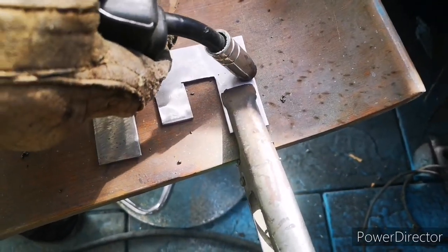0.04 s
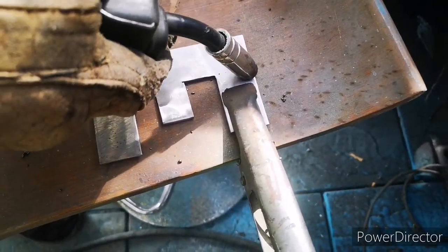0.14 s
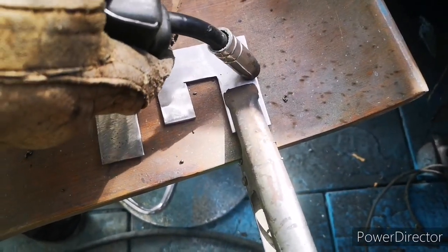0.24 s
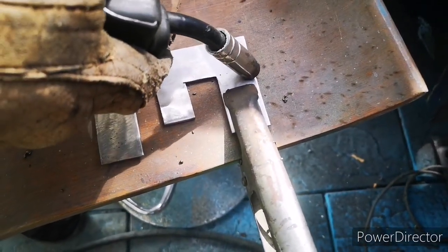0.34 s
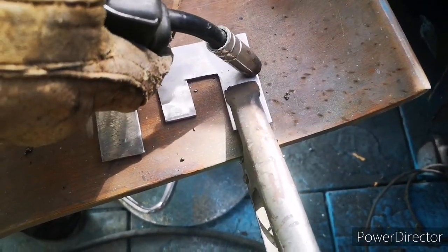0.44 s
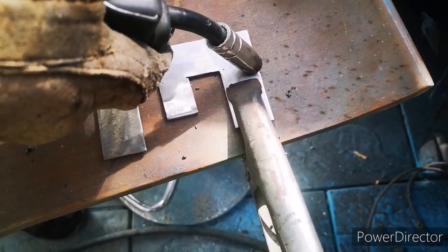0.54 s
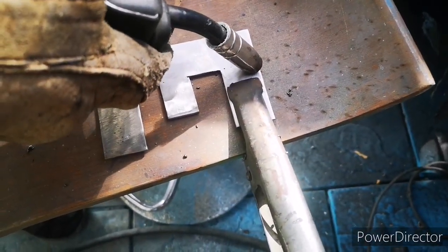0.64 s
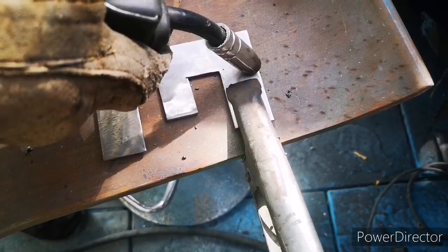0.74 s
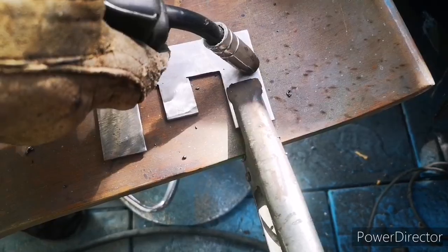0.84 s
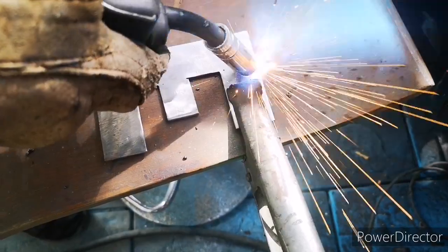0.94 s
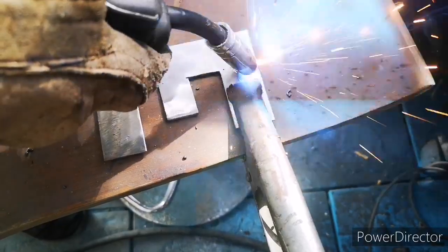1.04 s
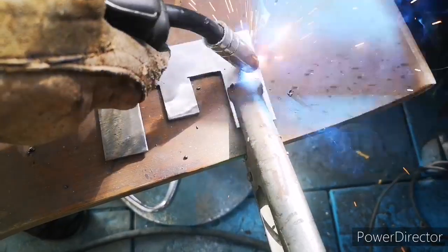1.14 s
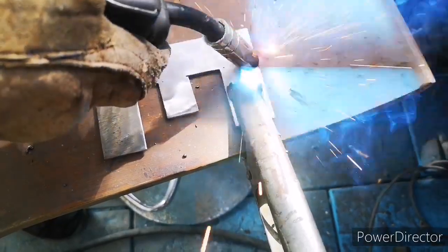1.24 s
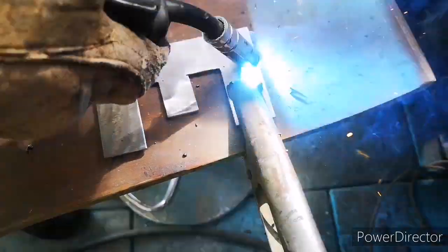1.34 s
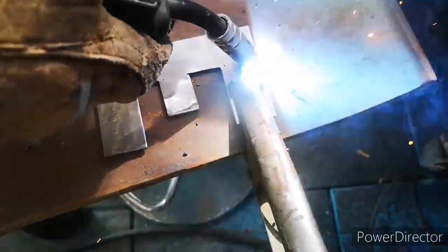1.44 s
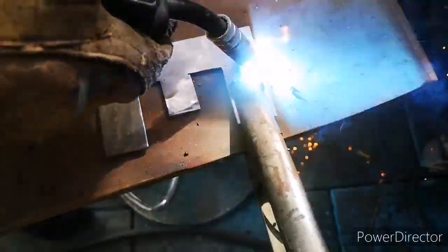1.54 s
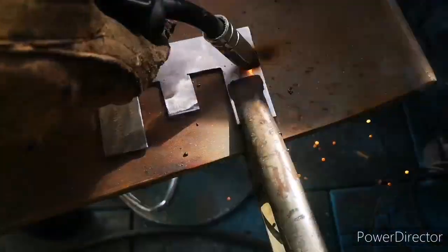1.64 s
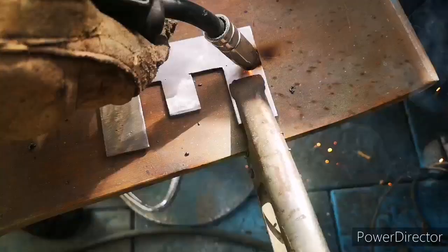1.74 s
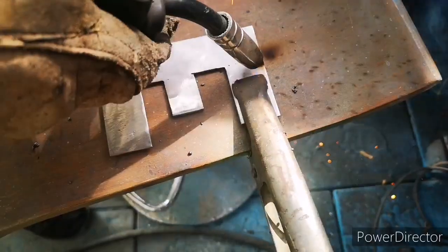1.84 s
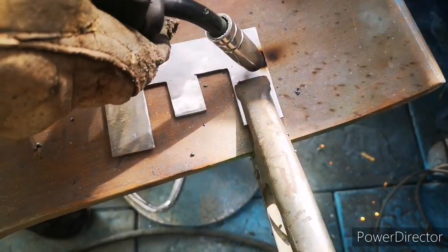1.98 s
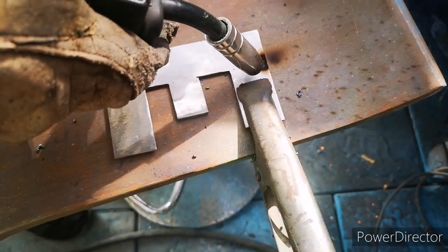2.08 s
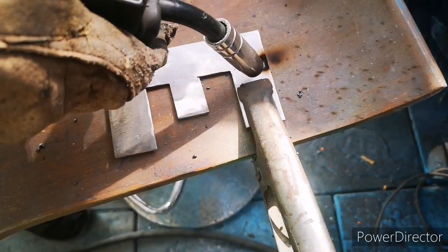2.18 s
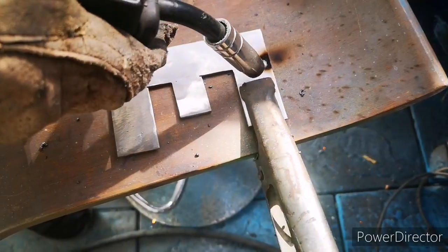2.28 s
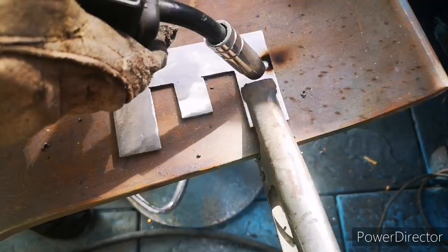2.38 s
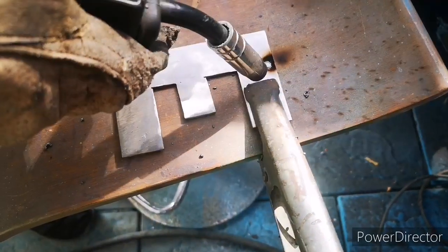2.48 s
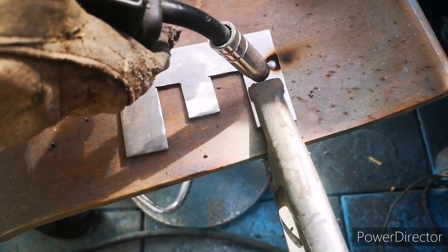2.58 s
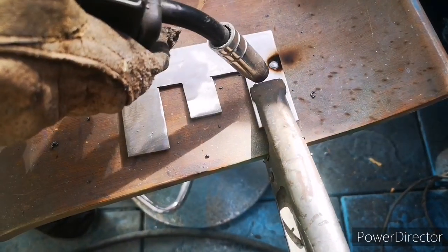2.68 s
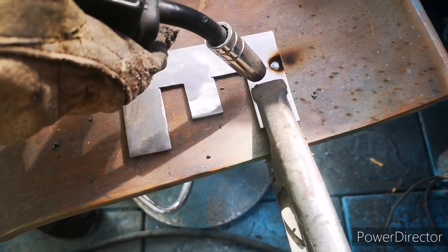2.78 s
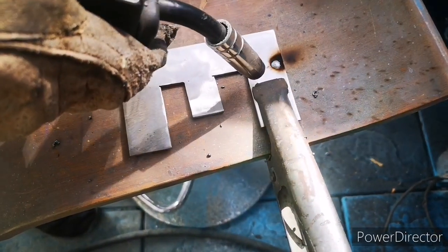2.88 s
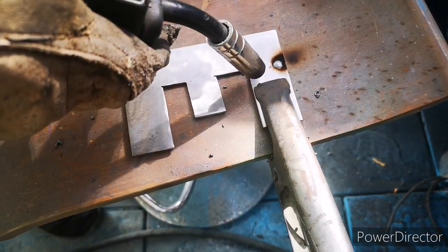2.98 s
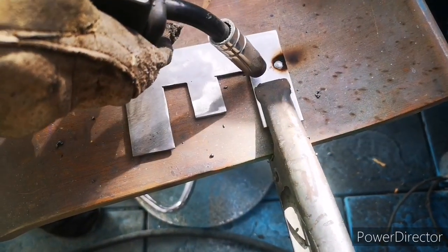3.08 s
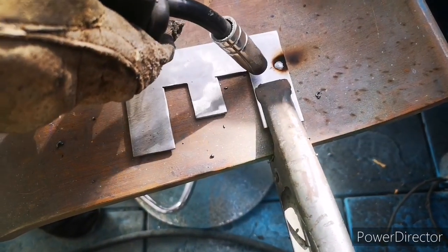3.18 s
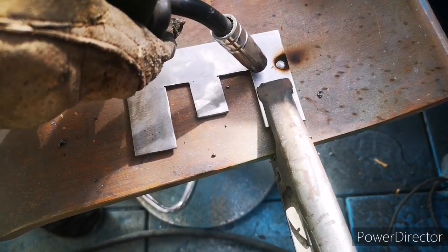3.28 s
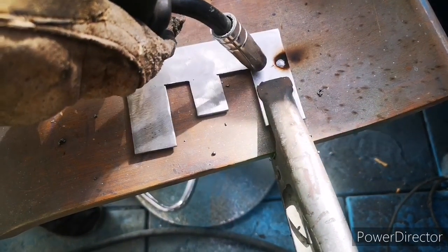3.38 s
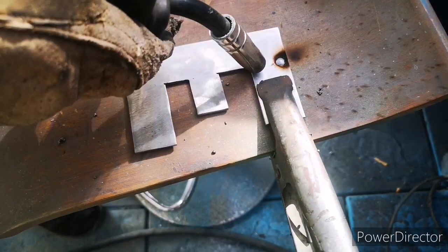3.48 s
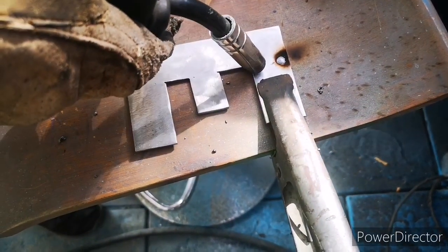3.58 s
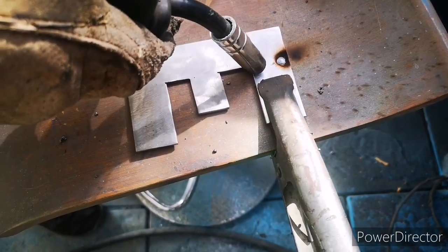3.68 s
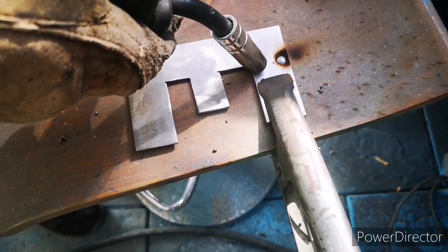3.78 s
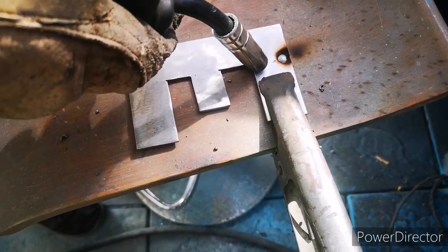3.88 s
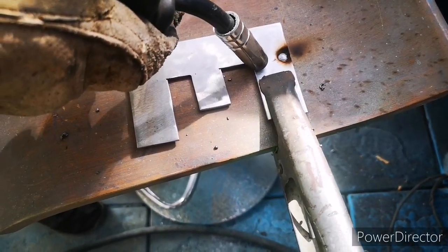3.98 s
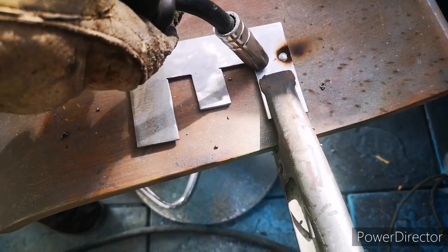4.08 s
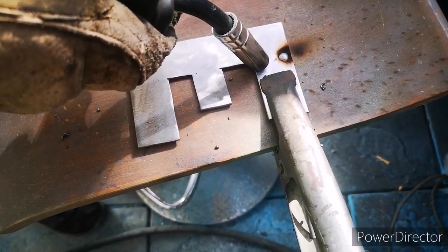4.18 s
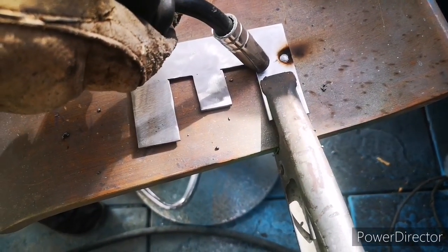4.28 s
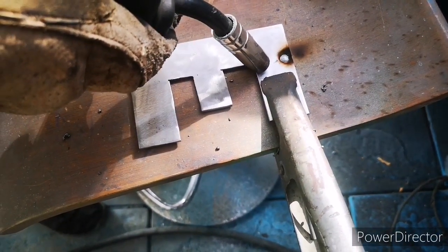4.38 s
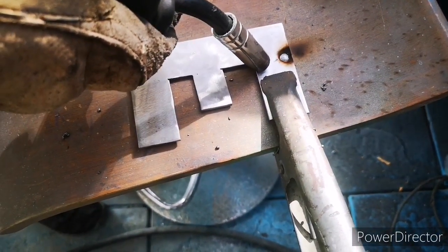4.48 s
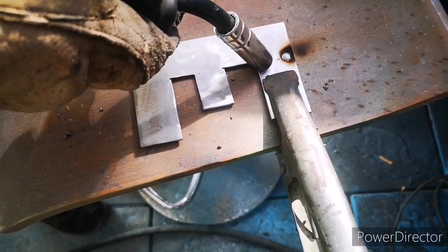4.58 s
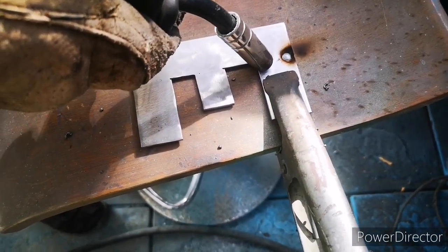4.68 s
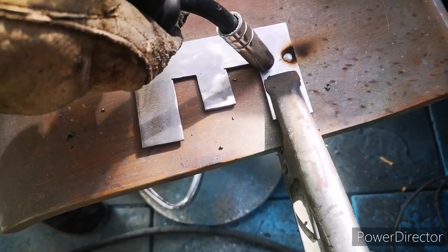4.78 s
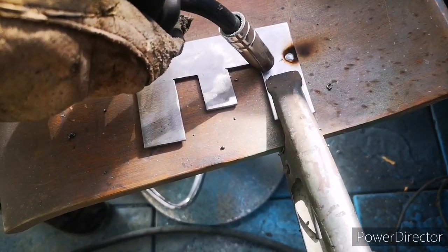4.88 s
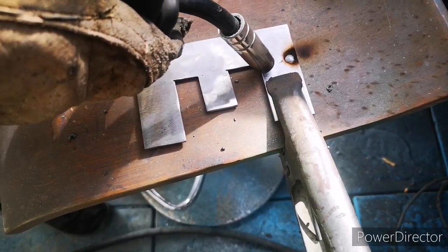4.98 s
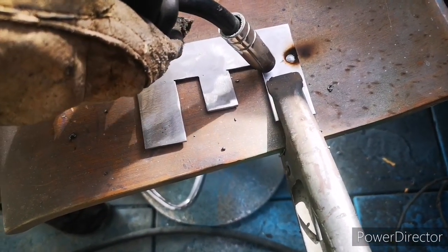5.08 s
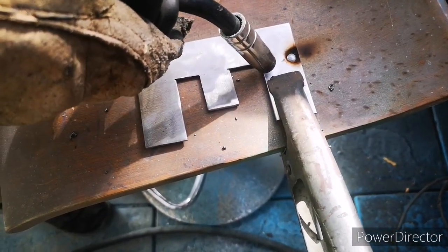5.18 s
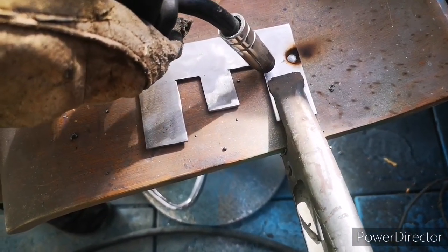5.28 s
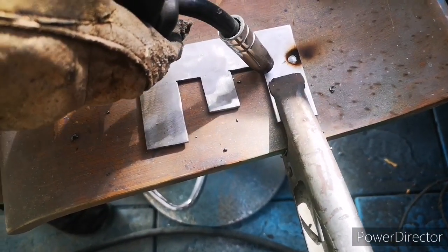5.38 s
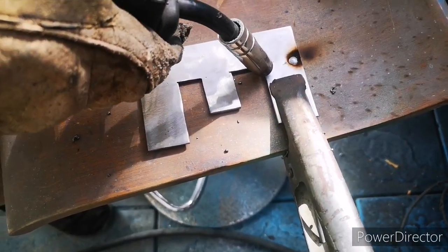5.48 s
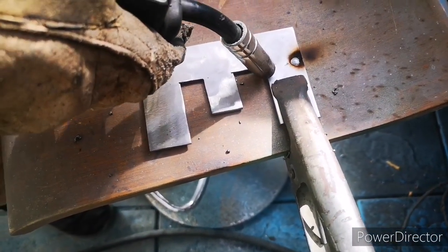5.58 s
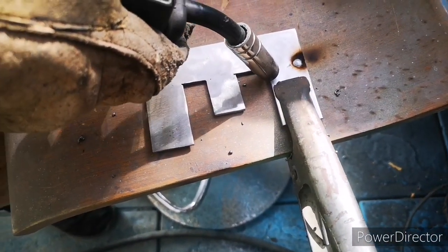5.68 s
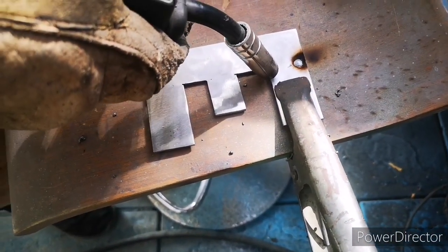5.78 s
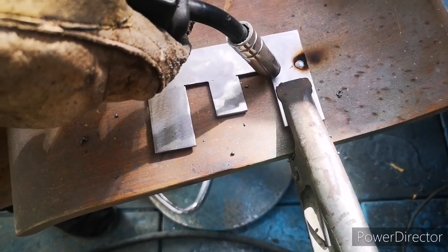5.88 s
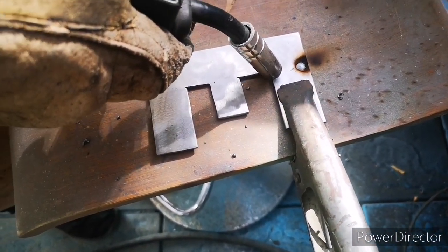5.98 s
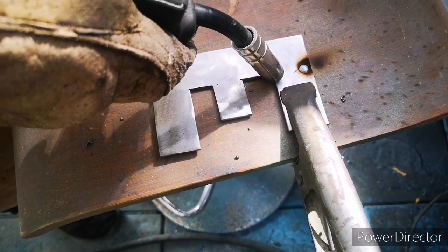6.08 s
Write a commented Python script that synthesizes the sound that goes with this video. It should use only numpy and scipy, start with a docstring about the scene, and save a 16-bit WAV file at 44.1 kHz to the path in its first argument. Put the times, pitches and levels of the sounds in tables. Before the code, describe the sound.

Short spot weld in a garage: harsh electric popping, a clunk, tiny metallic pings, later hissing gas and whirring wire feed without an arc.

```python
"""Spot weld in a garage

A wire welder lays one spot weld on thin steel, heard by a phone with a left port brighter than its right. The
trigger knocks, the contactor clunks, filtered noise makes the wire feed, and arc pops crack, mostly on the
crests of the mains ripple; spatter beads then ping the plate as decaying modes. Later the trigger is pulled
without an arc. Gas hisses in spells through resonant peaks, a glove rubs the bench, over transformer hum and
fan rumble, whose recorded level the phone's automatic gain raises and lowers together, as a table of levels."""
import sys
import numpy as np
from scipy import signal
from scipy.fft import rfft, irfft
from scipy.io import wavfile
from scipy.ndimage import uniform_filter1d

SR = 44100
rng = np.random.default_rng(int(sys.argv[2]) if len(sys.argv) > 2 else 0)


def ratio_of_db(decibels):
    """Turn decibels (scalar or array-like) into linear amplitude factors; 0 dB maps to 1."""
    return 10 ** (np.asarray(decibels, float) / 20)


def dump(signal):
    """Clip the signal to [-1, 1] and save it as 16-bit WAV at the path in sys.argv[1]."""
    limited = np.clip(np.atleast_2d(signal).T, -1, 1)
    pcm = np.round(limited * 32767).astype(np.int16)
    wavfile.write(sys.argv[1], SR, pcm)


N = 270333
T = np.arange(N) / SR
RIPPLE_HZ = 100
# Levels in dB are settings at the source, ahead of further gains, room and microphone ports.


def unit(x):
    """Scale to rms 1."""
    return x / np.sqrt(np.mean(x ** 2))


def curve(rows):
    """Gain over time through (s, dB) rows, silent outside them."""
    s, db = np.transpose(np.array(rows, float))
    return ratio_of_db(np.interp(T, s, db, -200, -200))


def colour(x, points, size=2048):
    """Minimum-phase filter through (Hz, dB) points, built by folding the cepstrum."""
    hz, db = np.transpose(points)
    bins_hz = np.arange(size // 2 + 1) * SR / size
    gain = ratio_of_db(np.interp(np.log(bins_hz + 1), np.log(hz), db))
    cepstrum = irfft(np.log(gain))
    cepstrum[1:size // 2] *= 2
    cepstrum[size // 2 + 1:] = 0
    response = irfft(np.exp(rfft(cepstrum)))[:size // 2]
    return signal.oaconvolve(x, response)[:len(x)]


def band(x, hz, width):
    """One resonance, gain 1 at the centre."""
    return signal.lfilter(*signal.iirpeak(hz, hz / width, SR), x)


def noise():
    """White noise."""
    return rng.standard_normal(N)


def walk(rate):
    """Slow random wander of rms 1, smoothed twice over 1/rate seconds."""
    k = int(SR / rate)
    return unit(uniform_filter1d(uniform_filter1d(noise(), k), k))


def strikes(times, gains):
    """Single-sample impulses."""
    out = np.zeros(N)
    np.add.at(out, (np.asarray(times) * SR).astype(int), gains)
    return out


def ring(x, modes, rise_s=1e-5):
    """Impulses ring a set of decaying modes (Hz, dB, t60 s)."""
    t = T[:SR // 2]
    shape = sum(ratio_of_db(db - 60 * t / t60) * np.sin(2 * np.pi * hz * t) for hz, db, t60 in modes)
    shape *= 1 - np.exp(-t / rise_s)
    return signal.oaconvolve(x, shape / abs(shape).max())[:N]


def spell(start, rise_s, stop, db, fall_db_per_s, sag_db_per_s=0, burst_db=0, burst_s=1):
    """Gain that rises from silence to a burst, holds with a slow sag until stop, then falls."""
    since = np.clip(T - start - rise_s, 0, None)
    rise_db = -40 * np.clip(1 - (T - start) / rise_s, 0, 5)
    burst = burst_db * np.exp(-since / burst_s)
    return ratio_of_db(db + rise_db + burst - sag_db_per_s * since - fall_db_per_s * np.clip(T - stop, 0, 1))


# Balance of the microphone ports for close sounds and for the room.
# Each row: frequency in Hz, left minus right in dB.
CLOSE_BALANCE = [(60, 28.5), (110, -13), (200, -3.5), (380, 4.5), (700, 5), (1290, 4.5), (2380, 8),
                 (4400, 12.5), (8120, 38), (15000, 14.5)]
ROOM_BALANCE = [(60, 8), (110, 5), (200, 0), (380, -1), (700, 4.5), (1290, 3), (2380, 12.5), (4400, 5),
                (8120, 4), (15000, 1)]


def ports(left, right, balance, lag_ms):
    """Each port colours its sound; the right one hears it later."""
    hz, db = np.transpose(balance)
    total = 10 * np.log10((1 + ratio_of_db(2 * db)) / 4)
    late = np.interp(T - lag_ms / 1000, T, right)
    return np.array([colour(left, np.transpose([hz, db - total])),
                     colour(late, np.transpose([hz, -total]))])


def spread(make, share, balance, lag_ms):
    """Steady noise: the right port gets partly the same, partly unrelated sound."""
    same, other = make(), make()
    return ports(same, share * same + np.sqrt(1 - share ** 2) * other, balance, lag_ms)


# Garage reverberation. Each row: band centre in Hz, t60 in seconds.
GARAGE_T60 = [(300, 0.25), (1000, 0.29), (3000, 0.33), (7000, 0.16), (13000, 0.061)]


def echoes(x, wet_db):
    """Direct sound plus a diffuse tail, shortest in the high treble; its lowest band is alike at both ports."""
    t = T[:SR // 2]

    def fade(hz, t60):
        return band(rng.standard_normal(len(t)), hz, 1.1 * hz) * ratio_of_db(-60 * t / t60)

    bass = fade(*GARAGE_T60[0])
    out = []
    for _ in range(2):
        tail = bass + sum(fade(hz, t60) for hz, t60 in GARAGE_T60[1:])
        tail = tail * np.clip(t / 0.003, 0, 1)
        tail /= np.sqrt(np.sum(tail ** 2))
        out.append(x + ratio_of_db(wet_db) * signal.oaconvolve(x, tail)[:N])
    return out


# Level of hum and fan as the phone's automatic gain raises and lowers them together.
# Each row: time in seconds, level in dB.
SHOP_LEVEL = [(0.0, -48), (0.14, -42.5), (0.36, -48), (0.94, -48), (1.06, -36), (1.16, -55), (1.47, -48.5),
              (1.79, -43.5), (2.46, -50.5), (2.99, -51.5), (3.28, -44.5), (3.45, -49), (3.77, -46.5),
              (4.17, -47), (5.02, -45.5), (5.16, -52.5), (5.34, -45.5), (5.7, -52), (5.87, -45),
              (6.13, -47)]
# Colours of the fan rumble and of the room noise. Each row: frequency in Hz, gain in dB.
FAN_COLOUR = [(18, -33.5), (32, 1), (60, -8.5), (88, -19), (115, -10), (150, -3.5), (190, -0.5), (212, 0.5),
              (225, 5.5), (245, -7.5), (340, -18), (450, -53.5)]
AIR_COLOUR = [(180, -26.5), (300, -11), (366, -9), (447, -3.5), (574, -6.5), (749, -5), (1100, -11.5),
              (1500, -14), (2360, -10), (4160, -28.5), (5800, -32.5), (7800, -34), (9500, -46),
              (15000, -57.5)]
# Faint tones. Each row: frequency in Hz, level in dB.
WHINE_TONES = [(1250, -71.5), (1300, -79.5), (1524, -76.5), (7790, -85.5)]


def shop():
    """Transformer hum at the ripple rate, fan rumble, faint whines and diffuse room noise."""
    level = curve(SHOP_LEVEL)
    hum = np.sin(2 * np.pi * RIPPLE_HZ * T + 0.33 * walk(1.7))
    hum *= np.sqrt(2) * level * ratio_of_db(1.1 * walk(6))
    fan = spread(lambda: unit(colour(noise(), FAN_COLOUR, size=8192)), 1.0, ROOM_BALANCE, 0.76)
    fan *= level * ratio_of_db(2.6 * walk(4.4))
    air = spread(lambda: unit(colour(noise(), AIR_COLOUR)), 0.5, ROOM_BALANCE, 0.6)
    air *= ratio_of_db(-58 + 0.095 * walk(3.3))
    tones = sum(ratio_of_db(db + 1.2 * walk(5.9)) * np.sin(2 * np.pi * hz * T) for hz, db in WHINE_TONES)
    return hum + fan + air + ports(tones, tones, CLOSE_BALANCE, 0.47)


# Gas spells. Each row: opening in seconds, level in dB, start of easing in seconds, easing in dB,
# shutting in seconds.
GAS_SPELLS = [(-.1, -54, .2, 8, .95), (3.535, -52, 3.93, 6.5, 4.33), (5.738, -51.5, 6.2, 5, 6.3)]
# Colour of the broad hiss. Each row: frequency in Hz, gain in dB.
HISS_COLOUR = [(1530, -43), (2600, -54), (3660, 7.5), (4390, -5.5), (5040, 3.5), (6230, 0), (7890, 5),
               (9330, -6), (14500, -10.5), (15500, -21), (16000, -53)]
# Resonant peaks of the hiss. Each row: frequency in Hz, base width in Hz (doubled or tripled below), level in
# dB.
HISS_PEAKS = [(1956, 76, 7.5), (2167, 64, 14), (3652, 95, 7), (5010, 70, 3.5), (5670, 75, -2.5),
              (7740, 130, -6), (9270, 73, -19), (10800, 120, -20), (12300, 130, -22), (13600, 130, -15)]


def gas():
    """Broad hiss through resonant peaks; the two lowest make the whistle band."""
    def hiss():
        air = noise()
        peaks = sum(ratio_of_db(db) * band(air, hz, 3 * w) for hz, w, db in HISS_PEAKS[2:])
        return unit(unit(colour(air, HISS_COLOUR)) + .6 * unit(peaks))

    def whistle():
        air = noise()
        return unit(sum(ratio_of_db(db) * band(band(air, hz, 2 * w), 1920, 980) for hz, w, db in HISS_PEAKS[:2]))

    flow = 0
    for opens, db, eases, ease_db, shuts in GAS_SPELLS:
        puff = spell(opens, 0.014, shuts, db, fall_db_per_s=1999, sag_db_per_s=0.5, burst_db=1, burst_s=0.034)
        flow = flow + puff * ratio_of_db(-ease_db * np.clip((T - eases) / 0.081, 0, 1))
    broad = spread(hiss, 0.76, CLOSE_BALANCE, 0.65)
    whistling = ratio_of_db(2.5 + 0.67 * walk(8.6)) * spread(whistle, 0.66, CLOSE_BALANCE, 0.57)
    return flow * (broad + whistling)


# Glove rubbing on the bench. Each row: start in seconds, stop in seconds, level in dB, fall in dB per second.
RUBS = [(0.012, 0.027, -46.5, 500), (0.037, 0.096, -56.5, 200), (.1, 0.155, -48.5, 160),
        (1.864, 2.07, -58.5, 58), (2.079, 2.093, -52.5, 199.5), (4.011, 4.021, -53, 400)]


def glove():
    """Grainy leather on steel: band noise with a quickly wandering level."""
    strokes = sum(spell(start, 0.014, stop, db, fall) for start, stop, db, fall in RUBS)
    grain = ratio_of_db(5.5 + 1.5 * walk(40))
    leather = lambda: unit(band(band(noise(), 1650, 400), 790, 670))
    return strokes * grain * spread(leather, 0.74, ROOM_BALANCE, 0.28)


# Wire feeder runs. Each row: start in seconds, stop in seconds, level in dB, fall in dB per second.
FEED_RUNS = [(0.92, .985, -31, 529), (4.272, 4.925, -34, 193)]
# Colour of wire in the liner. Each row: frequency in Hz, gain in dB.
LINER_COLOUR = [(260, -22), (450, -30.5), (684, -12.5), (856, -4), (1220, -5), (1400, -14), (2830, -12.5),
                (3230, -16.5), (3590, -15), (4630, -20), (5620, -16.5), (6700, -26), (7930, -23.5),
                (9920, -38), (14600, -47.5), (16000, -99)]
# The wire snags and the motor band flares. Each row: time in seconds, rise above steady in dB.
WIRE_SNAGS = [(4.5, 4), (4.713, 7.5), (4.852, 8)]


def feeder():
    """Wire rubbing through the liner, and a motor band that throbs with the drive roller."""
    rise_s, roller_hz, snag_s = 0.062, 35.1, 0.015
    motor_db, motor_late_s, motor_early_s = -5.5, 0.044, 0.043  # against the liner rub
    run = spin = 0
    for start, stop, db, fall in FEED_RUNS:
        run = run + spell(start, rise_s, stop, db, fall, sag_db_per_s=5.5, burst_db=6, burst_s=0.054)
        spin = spin + spell(start + motor_late_s, rise_s, stop - motor_early_s, db + motor_db, 600)
    liner = lambda: unit(colour(noise(), LINER_COLOUR))
    rub = run * ratio_of_db(0.85 * walk(40)) * spread(liner, 0.32, CLOSE_BALANCE, 0.491)
    motor = lambda: unit(band(band(noise(), 1215, 70), 1130, 170))
    throb = 1 + .5 * np.cos(2 * np.pi * roller_hz * (T - 4.5) + .5 * walk(5.3))
    spin *= ratio_of_db(sum(db * np.exp(-((T - s) / snag_s) ** 2) for s, db in WIRE_SNAGS))
    return rub + spin * throb * spread(motor, 1.0, CLOSE_BALANCE, 0.887)


# Trigger travel before the contactor pulls in. Each row: time in seconds, level in dB, frequency in Hz,
# t60 in seconds.
TRIGGER_KNOCKS = [(.944, -31.5, 794, 0.049), (.957, -28, 1168, 0.024), (4.301, -34.5, 786, 0.11),
                  (4.313, -33.5, 1184, 0.14)]
# Contactor clunks. Each row: time in seconds, level in dB, snap in dB, case ring in dB, bass tilt in dB.
CONTACTOR_CLUNKS = [(0.9732, -23.5, 8.5, -0.5, 5.5), (1.743, -28.5, 2.5, 4, 2),
                    (4.333, -26, 7.5, 10.5, 5.5), (5.1845, -31.5, 8.5, -2, 4)]
# Sheet-metal case modes. Each row: frequency in Hz, level in dB, t60 in seconds.
CASE_MODES = [(319, -12.5, .15), (462, 2.5, .2), (550, -13.5, 0.11), (708, 6, 0.22), (897, -17, 0.27),
              (1000, -7, .12), (1167, -10.5, 0.13), (1604, 3, 0.059), (1634, 6, 0.16), (1930, -8, 0.13),
              (2150, -12, .1)]
# Colour of the slam. Each row: frequency in Hz, gain in dB.
SLAM_COLOUR = [(120, -36.5), (250, -11), (460, -0.5), (620, -10.5), (900, -10), (1590, -1), (2300, -8.5),
               (3000, -15), (4040, -23.5), (5700, -26), (6600, -24.5), (7700, -10), (9000, -28.5),
               (12000, -39.5), (16000, -48)]


def contactor():
    """The trigger knocks twice; the armature snaps brightly, then a ragged slam shakes the sheet-metal case."""
    t, lead_s, out = T[:SR // 4], .008, 0
    for s, db, snap_db, ring_db, bass_db in CONTACTOR_CLUNKS:
        slam_noise, snap_noise, rough = rng.standard_normal((3, len(t)))
        ragged = ratio_of_db(3.0 * unit(uniform_filter1d(rough, size=130)))
        fade = np.exp(-t / 0.012) + 0.077 * np.exp(-t / 0.014)
        slam = slam_noise * ragged * np.clip((t - lead_s) / 0.0055, 0, 1) * fade
        slam = colour(unit(colour(slam, SLAM_COLOUR)), [(500, bass_db), (1300, 0.0032)])
        # the snap fades in quickly, peaks, then dies away
        fade_in, decay = np.exp((t - lead_s) / 0.0028) / 4, np.exp((lead_s - t) / 0.0062)
        snap = snap_noise * np.where(t < lead_s, fade_in, decay)
        snap = unit(colour(snap, [(2500, -24.5), (5500, 1.0), (8000, -4.5), (11000, -14.5), (16000, -23.5)]))
        start = strikes([s - lead_s], [0.16 * ratio_of_db(db + 4)])
        out = out + signal.oaconvolve(start, slam + ratio_of_db(snap_db - 13.5) * snap)[:N]
        out = out + ring(strikes([s + .008], [ratio_of_db(db + ring_db)]), CASE_MODES)
    for s, db, hz, t60 in TRIGGER_KNOCKS:
        out = out + ring(strikes([s], [ratio_of_db(db)]), [(hz, 0, t60)])
    return ports(*echoes(out, -1), CLOSE_BALANCE, 0.758)


# Jumps of welding current that kick the microphones. Each row: time in seconds, signed step.
CURRENT_KICKS = [(1.0562, 0.53), (1.0929, -0.25), (1.5142, -0.41)]
# Rectifier buzz while the contactor is in. Each row: time in seconds, level in dB.
BUZZ_LEVEL = [(1.0, -68.5), (1.15, -58.5), (1.42, -37), (1.52, -45), (1.6, -41.5), (1.732, -28),
              (1.74, -66)]


def current():
    """Current jumps sag back through the low cut; the rectifier adds downward dips; both ports alike."""
    s, step = np.transpose(CURRENT_KICKS)
    t = T[:SR // 2]
    sag = (1 - np.exp(-t / 0.0024)) * (2.0 * np.exp(-t / 0.0076) - 0.31 * np.exp(-t / .05))
    kicks = signal.oaconvolve(strikes(s, step), sag)[:N]
    phase = 2 * np.pi * RIPPLE_HZ * (T - .0073)
    # multiples of the ripple
    dips = -np.cos(phase) - 0.64 * np.cos(2 * phase) - 0.05 * np.cos(3 * phase) - 0.017 * np.cos(4 * phase)
    return kicks + curve(BUZZ_LEVEL) * dips


# Short circuits that stand out or fall off the beat. Each row: time in seconds, level in dB, treble tilt in dB
# (limited to -9..4 when cracking).
LONE_POPS = [(1.0093, -3, -11), (1.0152, 3.5, -27), (1.0558, 5, -1.5), (1.0941, 9.5, 2), (1.165, 1, 3),
             (1.1726, -1, -6), (1.1866, 0, 1), (1.1956, 2, -1), (1.206, -4, 0), (1.2133, -4.5, -2.5),
             (1.2158, -3.5, 2), (1.2345, 0.5, -1), (1.3139, -3, -6.5), (1.3253, -3, -6.5), (1.3637, 3, -9),
             (1.3845, -12, 2), (1.4054, 1, -11.5), (1.4143, 1.5, -9.5), (1.4833, -0.5, -6),
             (1.5152, 5.5, 7.5)]
# Steady transfer, one short per ripple crest. Each row: first short in seconds, number of crests,
# level in dB of the first, of the middle and of the last.
STEADY_RUNS = [(1.1342, 15, -7, -1, -5), (1.2938, 12, -6, -3, -7)]


def shorts():
    """All short circuits (s, dB, tilt dB): each crest of a run fires unless a listed pop stands there."""
    jitter_s, scatter_db, tilt_db = .0005, 1.5, 1.3
    rows = [np.array(LONE_POPS, float)]
    for first, count, *run_db in STEADY_RUNS:
        k = np.arange(count)
        timing, loudness, treble = rng.standard_normal((count, 3)).T
        s = first + k / RIPPLE_HZ + jitter_s * timing
        db = np.interp(k / (count - 1), [0, .5, 1], run_db) + scatter_db * loudness
        free = abs(s[:, None] - rows[0][:, 0]).min(axis=1) > .4 / RIPPLE_HZ
        rows.append(np.transpose([s, db, tilt_db * treble])[free])
    return np.vstack(rows).T


def tilted(times, db, tilt_db, shape, split_hz):
    """Blows of one shape whose treble is raised or lowered blow by blow."""
    low = signal.lfilter(*signal.butter(2, split_hz, fs=SR), shape)
    bass = signal.oaconvolve(strikes(times, ratio_of_db(db)), low)
    treble = signal.oaconvolve(strikes(times, ratio_of_db(db + tilt_db)), shape - low)
    return (bass + treble)[:N]


def thump(s, db):
    """Each short's suction pulse reaches the left port first; the phone subtracts part of each port from the other."""
    thump_db, rise_s, fade_s, lag_s, widen = -11.5, 0.00016, 0.00037, 0.00075, 0.38
    t = T[:SR // 100]
    pulse = (1 - np.exp(-t / rise_s)) * np.exp(-t / fade_s)
    left, right = (-signal.oaconvolve(strikes(s + lag, ratio_of_db(db + thump_db)), pulse)[:N] for lag in (0, lag_s))
    return np.array([left - widen * right, right - widen * left])


# Colours of the cracks and of the sizzle and fizz. Each row: frequency in Hz, gain in dB.
CRACK_TONE = [(150, -40.5), (500, -8.5), (1500, 0), (2500, -1.5), (4000, -3.5), (6000, -2.5), (7800, 2.5),
              (10000, -6.5), (14000, -24.5), (16500, -34)]
SIZZLE_TONE = [(180, -51.5), (300, -7), (546, -18.5), (915, -6), (2140, 1), (2480, -2), (3400, -1.5),
               (5520, -0.5), (6200, -4), (7820, 2.5), (9880, -15), (14200, -19.5), (16000, -33.5)]
# Plate modes. Each row: frequency in Hz, level in dB, t60 in seconds.
PLATE_MODES = [(3736, -24, .05), (4683, -18, .05), (5190, -8, .04), (5412, -12, .045), (5620, -12, .045),
               (5873, -5, .045), (6055, -6, .055), (6470, -16, .04), (7273, -18, .05), (7605, -10, .05),
               (7775, 0, .06), (8000, -12, .04), (8430, -14, .04), (9700, -18, .035), (11690, -22, .04)]
# Hard re-strikes that flare. Each row: time in seconds, starting level in dB, fade in ms.
RESTRIKES = [(1.057, -13.5, 2.8), (1.094, -16.5, 1.2), (1.483, -29, 6.7), (1.5167, -12, 1.4)]
# Plasma sizzle, then the glow after the last re-strike. Each row: start in seconds, rise in seconds,
# stop in seconds, level in dB, fall in dB per second.
SIZZLES = [(1.02, 0.2, 1.47, -35, 552), (1.512, 0.015, 1.555, -34, 117)]
# Port balance for the arc. Each row: frequency in Hz, left minus right in dB.
ARC_BALANCE = [(60, -7), (110, -0.5), (200, -12.5), (380, 2), (700, 13), (1290, -1.5), (2380, -3),
               (4400, 17.5), (8120, 19), (15000, 24.5)]


def arc():
    """Each short circuit cracks, rings the plate and leaves a brief fizz; the weld pool sizzles under it."""
    s, db, tilt_db = shorts()
    crack = colour(strikes([0, .0012, .0026], [1, .25, .2])[:2000], CRACK_TONE)
    pops = tilted(s, db - 6, np.clip(tilt_db, -9, 4), crack / abs(crack).max(), 4500)
    pops += ring(strikes(s, ratio_of_db(db - 31)), PLATE_MODES)
    blast = unit(colour(noise(), CRACK_TONE))
    for at, flare_db, fade_ms in RESTRIKES:
        pops += ratio_of_db(flare_db) * blast * (T > at) * np.exp(-np.abs(T - at) * 1000 / fade_ms)
    fizz = signal.lfilter([1], [1, -np.exp(-1 / (0.0017 * SR))], strikes(s, ratio_of_db(db - 18)))
    hiss_level = sum(spell(*row) for row in SIZZLES) * ratio_of_db(walk(150)) + fizz
    hiss = hiss_level * spread(lambda: unit(colour(noise(), SIZZLE_TONE)), 0.95, CLOSE_BALANCE, .5)
    # the current dip after each short reaches both ports alike
    dip = -signal.oaconvolve(strikes(s + 0.00044, ratio_of_db(db - 33.5)), np.hanning(int(0.00305 * SR)))[:N]
    return ports(*echoes(pops, -8.0), ARC_BALANCE, 0.068) + hiss + dip + thump(s, db)


# Spatter beads dropping on steel. Each row: time in seconds, level in dB, thud against it in dB.
BEADS = [(1.8392, -38.5, -6), (1.9704, -55, -1), (2.0402, -54, 8), (2.0835, -34, -16), (2.094, -26.5, -9),
         (2.2265, -40.5, 6), (2.2593, -56, -1.5), (2.2882, -56, 2.5), (2.536, -42.5, -10),
         (2.5563, -42.5, -10.5), (2.576, -40.5, -15)]


def spatter():
    """Beads ping the plate, with a dry scratch and a thud."""
    s, db, thud_db = np.transpose(BEADS)
    hits = strikes(s, ratio_of_db(db))
    ping = ratio_of_db(-3) * ring(hits, PLATE_MODES, rise_s=.0012)
    scratch = signal.lfilter([1], [1, -np.exp(-1 / (0.0072 * SR))], hits)
    scratch *= unit(band(band(noise(), 6400, 4560), 6200, 4600))
    thud = band(strikes(s, ratio_of_db(db + thud_db + 11.5)), 1760, 1400)
    return ports(*echoes(ping + .045 * scratch + thud, -21), CLOSE_BALANCE, .3)


def scene():
    """All sources at the two ports."""
    return shop() + gas() + glove() + feeder() + contactor() + current() + arc() + spatter()


def roll_off(x):
    """The treble ends steeply here."""
    return signal.sosfilt(signal.butter(12, 16500, fs=SR, output="sos"), x)


def record(dry):
    """The loudest cracks are rounded off at the microphones and the top above 15.9 kHz is cut."""
    rounded = .85 * np.tanh(dry / .85)
    low_pass = signal.ellip(10, .3, 90, 15900, fs=SR, output="sos")
    return roll_off(signal.sosfilt(low_pass, rounded))


dry = scene()
out = record(dry)
dump(out)
```